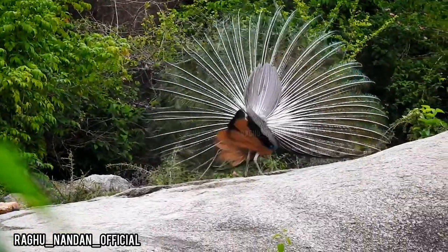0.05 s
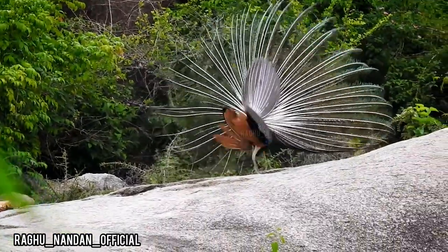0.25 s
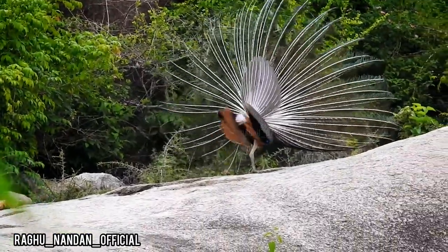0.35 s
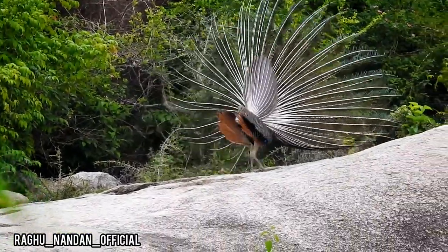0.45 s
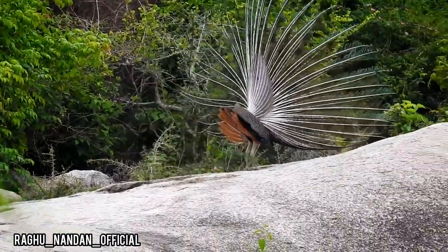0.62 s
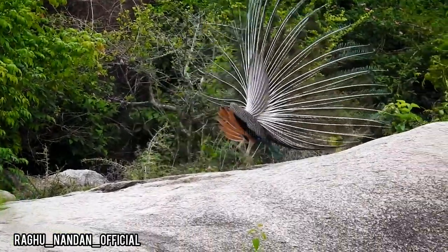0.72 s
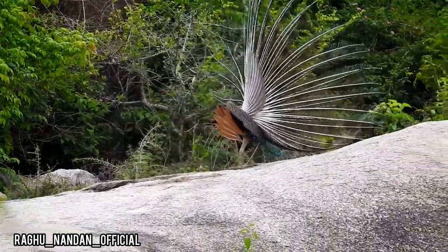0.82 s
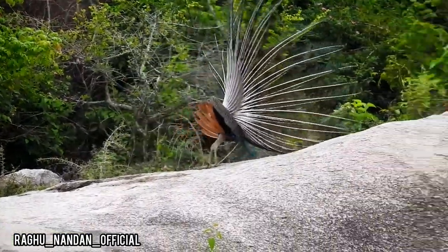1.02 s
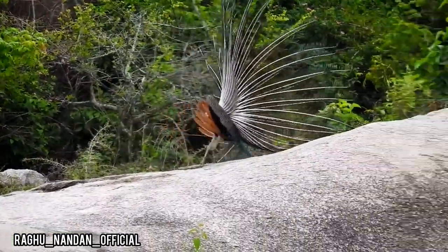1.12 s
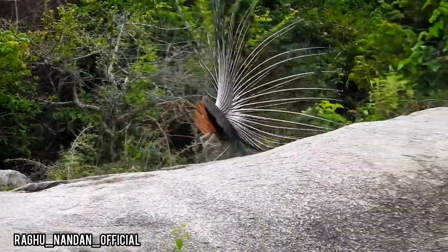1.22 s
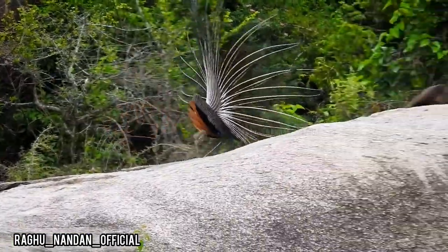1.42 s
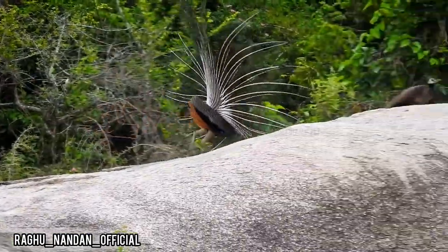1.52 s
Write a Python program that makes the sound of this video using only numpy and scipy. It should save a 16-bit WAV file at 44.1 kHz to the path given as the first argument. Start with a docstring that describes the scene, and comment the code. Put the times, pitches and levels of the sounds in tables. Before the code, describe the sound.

A bird in the bushes gives a quick chirp, a raspy slur and a thin rising and falling whistle, then two more chirps and a second whistle. Insects hiss steadily, and faint puffs of air bump the microphone.

```python
"""Outdoors, insects hiss steadily over a low rush; puffs of air bump mainly the right microphone, and
farther birds add faint notes. At 0.2 s a small bird in the bushes gives a quick arched chirp, a short
raspy slur and a long, thin, rising and falling whistle that ends in a quick falling flick. Two more
chirps follow, then at 0.8 s a second whistle. One voice makes them all: throat and beak favour the
second harmonic in the whistles and the third in the chirps. Leaves and rock scatter the calls."""
import sys
import numpy as np
from scipy import signal
from scipy.fft import rfft, irfft
from scipy.io import wavfile
from scipy.ndimage import uniform_filter1d

SR = 44100
rng = np.random.default_rng(int(sys.argv[2]) if len(sys.argv) > 2 else 0)


def output_pcm(signal):
    """Save a mono or channel-first signal as 16-bit PCM at the path in sys.argv[1].

    Samples are clipped to [-1, 1] before scaling.
    """
    pcm = np.clip(np.atleast_2d(signal).T, -1, 1) * 32767
    wavfile.write(sys.argv[1], SR, np.round(pcm).astype(np.int16))


N = 68355
T = np.arange(N) / SR
BIN_HZ = np.fft.rfftfreq(N, 1 / SR)

# Outdoor rush. Each row: frequency in Hz, left and right density in dB per Hz.
RUSH_SPECTRUM = [(20, -106.5, -79), (55, -77, -66), (114, -68.5, -79.5), (191.4, -66.5, -74),
                 (253, -77.5, -89), (417, -76, -88.5), (730, -78.5, -87), (1240, -84, -95.5),
                 (2240, -86, -93), (3780, -86, -93), (9300, -100, -103), (15500, -110, -112)]
# Insect chorus. Each row: frequency in Hz, relative density in dB.
INSECT_SPECTRUM = [(3000, -108), (4200, -92.5), (5100, -90), (5600, -83.5), (5950, -89.5), (6400, -86),
                   (7200, -89.5), (8200, -93.5), (9300, -104), (15500, -120)]
# Single insects that stand out. Each row: frequency in Hz, width in Hz, relative level in dB.
INSECT_SOLOS = [(5560, 52, -63.5), (5810, 46, -60), (5930, 30, -63)]
# Swell of all the insects. Each row: time in seconds, gain in dB.
INSECT_SWELL = [(0, 1), (.5, 4), (1.0, 3.5), (1.4, 3), (1.55, 6)]
# Notes of farther birds. Each row: middle and half length in seconds, top pitch in Hz,
# share of pitch lost at the ends, level in dB, relative level of the octave in dB.
DISTANT_NOTES = [(0.057, 0.14, 4310, 0.0047, -64, -40), (0.305, 0.05, 8740, 0.001, -57, -39),
                 (0.755, 0.032, 3472, .1, -39, -15), (0.812, 0.014, 2680, 0.011, -53.5, -37)]
# Puffs of air. Each row: middle in seconds, Gaussian width in seconds, relative level in dB.
AIR_PUFFS = [(0.025, 0.012, -42), (0.116, 0.029, -39.5), (0.189, 0.004, -33.5), (0.226, .011, -27.5),
             (0.333, 0.014, -33), (0.518, 0.0077, -35), (0.822, .014, -40.5), (0.92, 0.0057, -41.5),
             (1.355, 0.02, -44)]
# Three chirps and, in the second row, the first whistle's final flick. Each row: time of the top,
# rise and fall in seconds, top fundamental in Hz, source level in dB, roughness from 0 to 1.
PITCH_ARCHES = [(.2045, .0108, .0115, 2350, -29.5, .3), (.490, .003, .016, 2000, -39, .4),
                (.6078, .0152, .0148, 2650, -19.5, .14), (.7012, .0085, .012, 2405, -25.5, .3)]
# Their harmonics, from the first up. Each entry: relative source level in dB at the top of the arch.
ARCH_TOP_DB = [-9, -3, -2.5, -14]
# The same harmonics. Each entry: change in dB from the top to either end.
ARCH_END_CHANGE_DB = [-6, -17.5, 4, -4]
# Response of throat and beak. Each row: frequency in Hz, gain in dB.
BEAK_RESPONSE = [(2000, -26.5), (2600, -26), (2950, -31.5), (3600, -8.5), (4200, -4.5), (5200, -2),
                 (6000, -3), (7100, 1.5), (7900, -13), (9000, -23), (11000, -67)]
# Echo clouds. Each row: delay, build-up and time to decay by 60 dB in seconds, level in dB.
ECHO_CLOUDS = [(.001, 0.00083, 0.068, -13), (.006, 0.0031, 0.21, -11.5), (0.012, 0.062, 1.0, -28.5),
               (.15, .02, .35, -29.5)]
# The slur and the two whistles, one list apiece.
# Each row: time in seconds, fundamental in Hz, source level in dB, roughness from 0 to 1.
WHISTLE_CONTOURS = [
    [(.249, 2830, -31, .9), (.2585, 2500, -30.5, 0.7), (.265, 2963, -23, 0.2), (.274, 2736, -28, 0.3),
     (.282, 2315, -34, 0.4), (.289, 2076, -39.5, .5), (.297, 2100, -29.5, .6)],
    [(.298, 2350, -42, 0.7), (.309, 2560, -35.5, .8), (.322, 2400, -38, 0.5), (.334, 2094, -31, 0.2),
     (.342, 2130, -29.5, 0.2), (.351, 2360, -26.5, .06), (.371, 2506, -19.5, 0), (.390, 2592, -19, 0.05),
     (.420, 2628, -25, 0.08), (.438, 2565, -18, .02), (.455, 2436, -20.5, 0.05), (.473, 2327, -29, 0.1),
     (.484, 2030, -35.5, 0.3), (.491, 2010, -24, 0.3), (.497, 1900, -44.5, .6)],
    [(.793, 2910, -45, 0), (.811, 2793, -35.5, .05), (.822, 2635, -24, 0), (.838, 2858, -15.5, .02),
     (.852, 2971, -17.5, 0), (.870, 2966, -17, 0.01), (.887, 2723, -20.5, 0), (.901, 2656, -27, 0),
     (.916, 2488, -21.5, 0), (.931, 2353, -27.5, 0.4), (.941, 1910, -31, 0.8), (.947, 1800, -36, 0.64)],
]
# Their harmonics, from the first up. Each entry: relative source level in dB.
WHISTLE_SOURCE_DB = [-12.5, 2.5, -19.5, -28]


def from_db(db):
    """Decibels to amplitude ratio."""
    return 10 ** (np.asarray(db) / 20)


def unit_rms(x):
    """Normalisation to unit mean power."""
    return x / np.sqrt(np.mean(x ** 2) + 1e-20)


def filtered(x, table, column=1):
    """Linear filtering by a table of gains in dB, interpolated over log frequency."""
    table = np.array(table)
    db = np.interp(np.log(np.maximum(BIN_HZ, 1)), np.log(table[:, 0]), table[:, column])
    return irfft(rfft(x) * from_db(db), N)


def drift(rate_hz):
    """Random modulation: low-passed noise of unit rms."""
    return unit_rms(irfft(rfft(rng.standard_normal(N)) / (1 + (BIN_HZ / rate_hz) ** 2), N))


def noise(spectrum, column=1):
    """White noise shaped to a spectral density in dB per Hz."""
    return filtered(rng.standard_normal(N), spectrum, column) * np.sqrt(SR / 2)


def gate(start, end, edge_s):
    """A time window with soft ends."""
    return (1 + np.tanh((T - start) / edge_s / 2)) * (1 + np.tanh((end - T) / edge_s / 2)) / 4


def rush(patchy_db=1.3):
    """Flow noise of far air and foliage: the lower third-octave bands swell and sink independently."""
    band = np.floor(3 * np.log2(np.clip(BIN_HZ, 100, 4000)))
    spectra = rfft(np.array([noise(RUSH_SPECTRUM, column=1), noise(RUSH_SPECTRUM, column=2)]))
    swelling = sum(irfft(spectra * (band == b), N) * from_db(patchy_db * drift(rate_hz=20))
                   for b in np.unique(band)[:-1])
    steady_top = irfft(spectra * (band == band.max()), N)
    return swelling + steady_top


def pan(db):
    """Stereo gains for a level difference, left minus right."""
    return from_db(np.array([[db], [-db]]) / 2)


def insects(flutter_db=0.5):
    """Incoherent addition merges a far chorus into hiss; single insects stand out as narrow bands."""
    sides = []
    for _ in range(2):
        hiss = noise(INSECT_SPECTRUM) * from_db(flutter_db * drift(rate_hz=66))
        tones = np.zeros(N)
        for hz, width, db in INSECT_SOLOS:
            phase = 2 * np.pi * hz * T
            tones += from_db(db) * (drift(width) * np.sin(phase) + drift(width) * np.cos(phase))
        sides.append(hiss + tones)
    swell = from_db(np.interp(T, *np.transpose(INSECT_SWELL)))
    return pan(db=1.7) * swell * np.array(sides)


def wavering_phase(hz, waver_share=.002):
    """Phase is the integral of frequency, which here wavers slightly at random."""
    return 2 * np.pi * np.cumsum(hz * (1 + waver_share * drift(rate_hz=100))) / SR


def far_birds(end_change_db=-7.5):
    """Faint, nearly sinusoidal notes, arched or almost level in pitch."""
    out = np.zeros(N)
    for middle, half, hz, sag, db, octave_db in DISTANT_NOTES:
        flank = np.minimum(((T - middle) / half) ** 2, 2)
        phase = wavering_phase(hz * (1 - sag * flank))
        envelope = from_db(db + end_change_db * flank) * gate(middle - half, middle + half, edge_s=.0026)
        out += np.sqrt(2) * envelope * (np.sin(phase) + from_db(octave_db) * np.sin(2 * phase))
    return out


def puffs(band_hz=(38.3, 118), left_db=-9):
    """Turbulent pressure at the microphone ports makes short low bumps, mostly on the right."""
    envelope = sum(from_db(db) * np.exp(-.5 * ((T - middle) / width) ** 2)
                   for middle, width, db in AIR_PUFFS)
    band = signal.butter(2, band_hz, "band", fs=SR, output="sos")
    eddies = signal.hilbert(signal.sosfilt(band, rng.standard_normal((2, N))))
    even_rumble = signal.sosfilt(band, np.cos(np.angle(eddies)))   # phase alone evens out the strength
    return from_db([[left_db], [0]]) * envelope * unit_rms(even_rumble)


def syrinx(hz, harmonics_db, rough, rasp_hz=900, rasp_rad=.45):
    """A harmonic source; random modulation of its phase and amplitude is heard as rasp."""
    phase = wavering_phase(hz) + rasp_rad * rough * drift(rasp_hz)
    tone = sum(from_db(db) * np.sin(k * phase) for k, db in enumerate(harmonics_db, 1))
    return np.sqrt(2) * tone * (1 + rough * drift(rasp_hz)) / np.sqrt(1 + rough ** 2)


def beak(x):
    """Source and filter: throat and beak pass the harmonics between about 4 and 8 kHz."""
    return filtered(x, BEAK_RESPONSE)


def chirps_and_flick(sag_share=.29):
    """Frequency modulation: the chirps and the first whistle's final flick follow parabolas of pitch."""
    out = np.zeros(N)
    for top_s, rise, fall, hz, db, rough in PITCH_ARCHES:
        half = np.where(T < top_s, rise, fall)
        flank = np.minimum(((T - top_s) / half) ** 2, 2)   # 0 at the top, 1 at either end
        harmonics_db = [top + change * flank for top, change in zip(ARCH_TOP_DB, ARCH_END_CHANGE_DB)]
        envelope = from_db(db) * gate(top_s - rise, top_s + fall, edge_s=.0013)
        out += envelope * syrinx(hz * (1 - sag_share * flank), harmonics_db, rough)
    return beak(out)


def from_the_right(x, lag_s=3.1e-5):
    """Path difference: the sound reaches the left microphone a little later."""
    late = irfft(rfft(x) * np.exp(-2j * np.pi * BIN_HZ * lag_s), N)
    return np.array([late, x])


def scatter(x):
    """Multiple scattering: quick echoes from ground and near leaves, long faint ones from the hillside."""
    response = np.zeros((2, N))
    for delay, build, t60, db in ECHO_CLOUDS:
        age = np.maximum(T - delay, 0)
        envelope = (1 - np.exp(-age / build)) * from_db(-60 * age / t60)
        response += from_db(db) * envelope / np.linalg.norm(envelope) * rng.standard_normal((2, N))
    return pan(db=1.5) * signal.fftconvolve(x[None], response, axes=1)[:, :N]


def whistles():
    """A gliding oscillation: rough in the slur, nearly periodic in each whistle until its raspy fall."""
    out = np.zeros(N)
    for contour in WHISTLE_CONTOURS:
        times, *columns = np.transpose(contour)
        hz, db, rough = (np.interp(T, times, column) for column in columns)
        smooth_hz = uniform_filter1d(hz, size=200)
        envelope = from_db(db) * gate(times[0], times[-1], edge_s=.002)
        out += envelope * syrinx(smooth_hz, WHISTLE_SOURCE_DB, rough)
    return beak(out)


def scene():
    """Superposition of direct calls, their echoes, insects and moving air."""
    arches, whistling, far = chirps_and_flick(), whistles(), far_birds()
    near = pan(db=-1.7) * from_the_right(arches) + pan(db=.5) * from_the_right(whistling)
    echoes = scatter(arches + whistling + far)
    return near + far + echoes + insects() + rush() + puffs()


def record(dry, cutoff_hz=15700):
    """Band limiting: a steep low-pass filter removes the highest treble."""
    return signal.sosfilt(signal.ellip(10, .1, 80, cutoff_hz, fs=SR, output="sos"), dry)


dry = scene()
out = record(dry)
output_pcm(out)
```